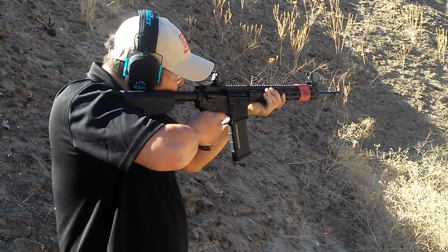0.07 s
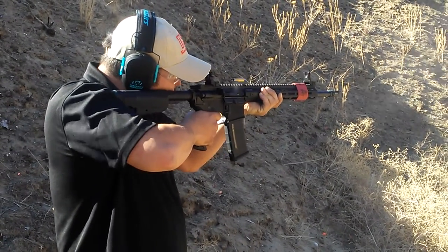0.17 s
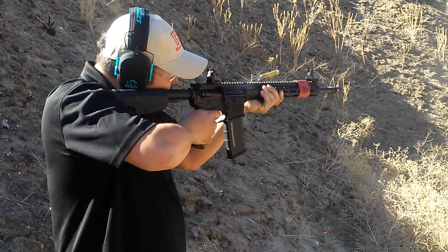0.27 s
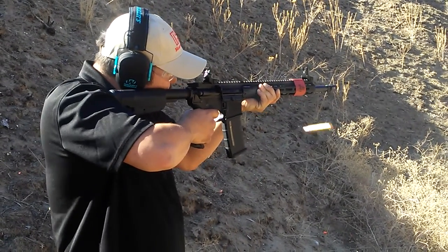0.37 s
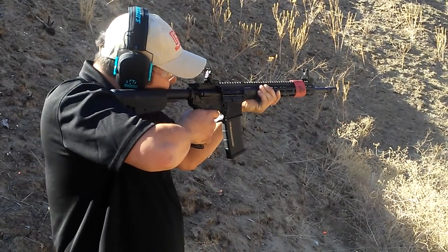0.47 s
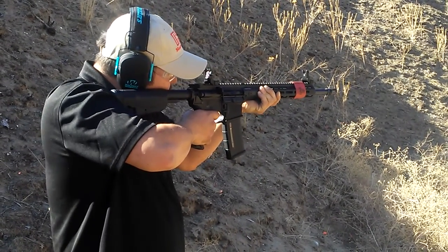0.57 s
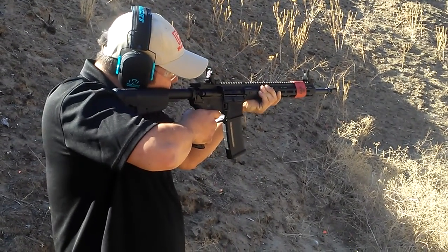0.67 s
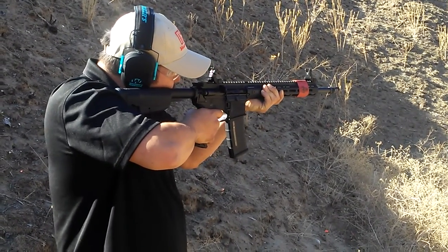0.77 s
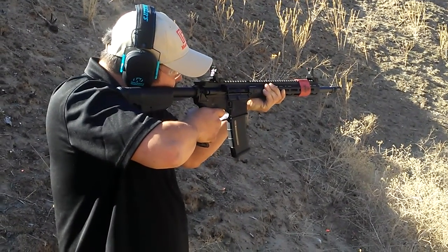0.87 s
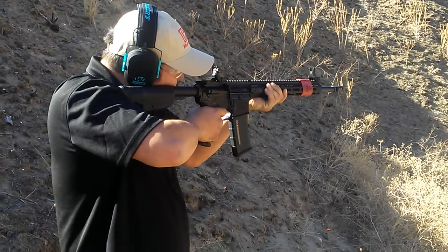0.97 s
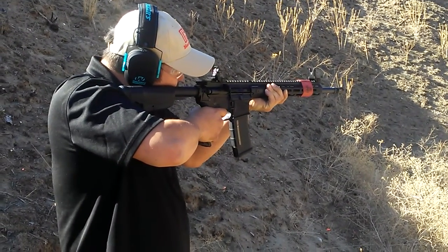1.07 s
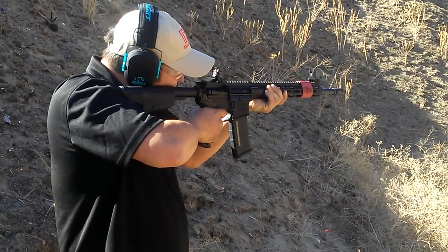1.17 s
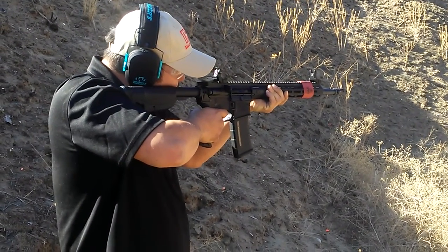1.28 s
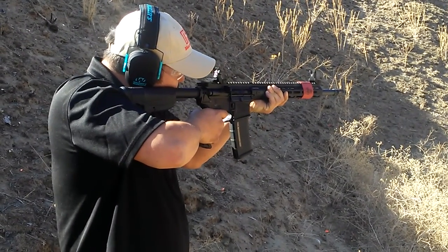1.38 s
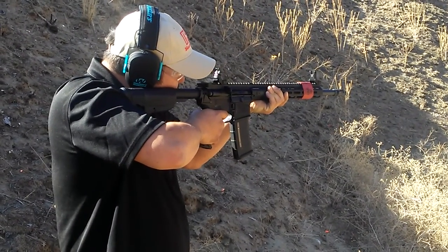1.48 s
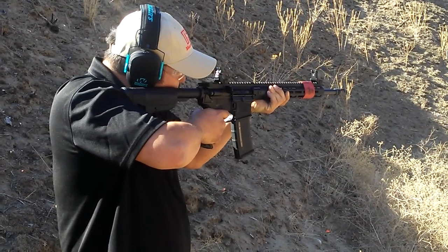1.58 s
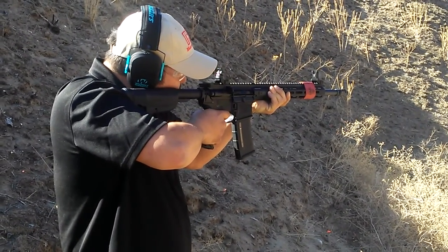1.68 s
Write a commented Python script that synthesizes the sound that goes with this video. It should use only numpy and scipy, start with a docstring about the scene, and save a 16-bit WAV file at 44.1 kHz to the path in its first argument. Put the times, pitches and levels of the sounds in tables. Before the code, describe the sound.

A single close, distorted rifle crack trails into a low rumble and a distant echo.

```python
"""One rifle shot on an outdoor range, close to a small microphone that it drives into hard clipping.
First a far hillside still returns an earlier shot as a dull wash and a low thump. At 0.2 s the action
ticks and the muzzle blast cracks and booms. Earth banks scatter it for half a second over a low roll;
meanwhile the bolt slams shut, then single rocks and slopes answer. From 1.1 s the hillside returns
this shot's wash and thump."""
import sys
import numpy as np
from scipy import signal
from scipy.fft import rfft, irfft, next_fast_len
from scipy.io import wavfile
from scipy.ndimage import map_coordinates

SR = 44100
rng = np.random.default_rng(int(sys.argv[2]) if len(sys.argv) > 2 else 0)


def store_wav(level_fs):
    """Save 16-bit WAV to argv[1]."""
    pcm = np.round(np.clip(np.atleast_2d(level_fs), -1, 1) * 32767)
    wavfile.write(sys.argv[1], SR, pcm.T.astype(np.int16))


N = 77175
TIME_S = np.arange(N) / SR
FFT_SIZE = next_fast_len(N + SR // 4)
FREQ_HZ = np.fft.rfftfreq(FFT_SIZE, 1 / SR)
SHOT_S = 0.2025

# Open-air background: freq_hz, level_db
AIR_SPECTRUM = [(20, 2), (60, 17), (300, 11), (1500, 1.5), (3000, -9.5), (5000, -8), (7000, -16),
                (15000, -14)]
# Washes off the far hillside: centre_s, level_db, half_width_s
HILL_WASHES = [(.02, -41, 0.12), (.15, -40.5, .06), (1.125, -49.5, 0.042), (1.22, -41, 0.041),
               (1.36, -40, 0.079), (1.455, -38.5, .035), (1.55, -44, 0.079), (1.7, -49.5, 0.068)]
# Hillside wash: freq_hz, level_db
HILL_SPECTRUM = [(25, -29.5), (70, -9.5), (120, -8.5), (160, -12), (260, -3.5), (480, -4.5), (690, -1.5),
                 (850, -10), (1200, -7), (1800, -12), (2000, -17), (2350, -17.5), (2800, -40.5),
                 (4000, -38), (6500, -59.5), (15000, -82)]
# Low thumps: the hillside returning an earlier shot, then the blast's push and its returns: centre_s, level_db,
# half_width_s, pitch_hz
BASS_THUMPS = [(.145, -35, .025, 59.9), (.238, -7, 0.017, 57.25), (.377, -5, 0.0017, 192),
               (0.403, -18, 0.018, 88), (.894, -27, 0.006, 228), (1.197, -28, 0.016, 55)]
# Action tick: freq_hz, level_db
TICK_SPECTRUM = [(200, -16), (1200, -6), (2500, 4), (3800, -8.5), (5000, -1.5), (6500, -21), (10000, -17.5),
                 (15000, -22.5)]
# Muzzle crack: freq_hz, level_db
CRACK_SPECTRUM = [(40, -14), (200, -5.5), (500, -0.5), (900, -1.5), (1400, -5), (1950, 1), (2700, -9.5),
                  (4500, -18), (6500, -27), (9000, -40), (15000, -50)]
# Muzzle boom: freq_hz, level_db
BOOM_SPECTRUM = [(20, -39), (36, -26), (55, -2), (130, -10.5), (270, 2), (420, -5.5), (650, 0.5),
                 (1100, -16), (2200, -19), (5000, -24), (7000, -48), (15000, -71.5)]
# Earth-bank scatter: freq_hz, level_db
BANK_SPECTRUM = [(20, -49), (40, -28), (75, -8), (130, -2), (330, 1.5), (700, 1.5), (1300, -3.5),
                 (2050, -5.5), (2650, -15), (4100, -14), (5200, -19), (6300, -30.5), (7400, -46.5),
                 (9000, -41), (15000, -53)]
# Valley rumble: freq_hz, level_db
ROLL_SPECTRUM = [(20, -28), (55, -10), (150, -5.5), (290, -6), (450, -12.5), (900, -22.5), (2200, -26),
                 (3200, -48), (15000, -84)]
# Closing bolt: freq_hz, level_db
BOLT_SPECTRUM = [(200, -22), (1200, -7.5), (2500, 2), (4000, -1.5), (5600, 2.5), (7000, -18.5),
                 (11000, -26.5), (13500, -17), (15500, -22)]
# Slaps off near rocks: start_s, level_db, t60_s, tilt_db_per_octave
ROCK_SLAPS = [(.3635, -26, 0.032, 2), (0.39, -16, 0.42, 2.5), (0.45, -17.5, 0.14, 6),
              (0.497, -18, 0.18, -0.5), (.565, -18.5, 0.03, 2.5), (0.6043, -13, 0.051, -2),
              (.622, -22, 0.066, 5.5), (0.651, -23, 0.029, 8.5), (0.682, -19, 0.081, -4.5)]
# Rock slap before tilt: freq_hz, level_db
ROCK_SPECTRUM = [(100, -41), (500, -18), (1200, 16), (2000, 5), (2700, -2.5), (4300, 2), (5600, -21),
                 (7200, -41), (15000, -64)]
# Echoes off earth slopes: centre_s, level_db, half_width_s
SLOPE_ECHOES = [(.376, -20.5, 0.011), (.415, -12, 0.004), (.55, -18, 0.0046), (.695, -22.5, 0.016),
                (.735, -26, 0.053), (.78, -22.5, 0.02), (.82, -31, 0.016), (.894, -38, 0.0073)]
# Slope echo: freq_hz, level_db
SLOPE_SPECTRUM = [(30, -43.5), (100, -9.5), (280, 2.5), (480, -2.5), (750, -5.5), (950, -15), (1500, -10.5),
                  (2500, -23), (4500, -34), (7000, -65.5), (15000, -67)]


def gain(level_db):
    """Decibels to amplitude."""
    return 10 ** (level_db / 20)


def noise(spectrum):
    """Noise of rms 1, spectrum interpolated over log frequency."""
    freq_hz, level_db = np.transpose(spectrum)
    shape_db = np.interp(np.log(FREQ_HZ + 1), np.log(freq_hz + 1), level_db)
    white = rng.standard_normal(FFT_SIZE)
    shaped = irfft(rfft(white) * gain(shape_db), FFT_SIZE)[:N]
    return shaped / np.sqrt(np.mean(shaped ** 2))


def burst(start_s, level_db, t60_s, rise_s):
    """Envelope: quick rise, exponential decay."""
    age_s = np.maximum(TIME_S - start_s, 0)
    return (1 - np.exp(-age_s / rise_s)) * gain(level_db - 60 * age_s / t60_s)


def swell(centre_s, level_db, half_width_s):
    """Gaussian envelope."""
    return gain(level_db) * np.exp(-0.5 * ((TIME_S - centre_s) / half_width_s) ** 2)


def swells(rows):
    """Envelope of unrelated swells, summed in power."""
    return np.sqrt(sum(swell(*row) ** 2 for row in rows))


def flicker(rate_hz, depth_db):
    """Smooth random gain."""
    knots = rng.standard_normal(N // 10)
    return gain(depth_db * map_coordinates(knots, [TIME_S * rate_hz]))


def open_air():
    """Quiet, steady background."""
    return gain(level_db=-55.5) * noise(AIR_SPECTRUM)


def hillside():
    """Far echoes, treble lost on the way."""
    return swells(HILL_WASHES) * flicker(rate_hz=56, depth_db=1.17) * noise(HILL_SPECTRUM)


def thumps():
    """Pressure waves of a few low cycles each."""
    return sum(swell(centre_s, level_db, half_width_s) * np.sin(2 * np.pi * pitch_hz * (centre_s - TIME_S))
               for centre_s, level_db, half_width_s, pitch_hz in BASS_THUMPS)


def action_tick():
    """The action ticks just ahead of the blast."""
    return burst(start_s=0.195, level_db=-17, t60_s=0.03, rise_s=0.0005) * noise(TICK_SPECTRUM)


def muzzle_blast():
    """Sharp crack, slower boom behind it."""
    crack = burst(SHOT_S, level_db=18.5, t60_s=0.1, rise_s=0.0022) * noise(CRACK_SPECTRUM)
    boom = burst(SHOT_S, level_db=9, t60_s=0.3, rise_s=0.012) * noise(BOOM_SPECTRUM)
    return crack + boom


def bank_scatter(air_db_per_s_khz2=0.25, end_s=0.793, end_db_per_s=197):
    """Dense, uneven scatter; dulls with path length, dies where the banks end."""
    freq_hz, frame_s, frames = signal.stft(noise(BANK_SPECTRUM), SR, nperseg=256)
    freq_khz = freq_hz[:, None] / 1000
    air_loss_db = air_db_per_s_khz2 * freq_khz ** 2 * np.maximum(frame_s - SHOT_S, 0)
    end_loss_db = end_db_per_s * np.maximum(frame_s - end_s, 0)
    _, scatter = signal.istft(frames * gain(-air_loss_db - end_loss_db), SR, nperseg=256)
    envelope = burst(SHOT_S, level_db=-1, t60_s=0.98, rise_s=0.015)
    return envelope * flicker(rate_hz=220, depth_db=1) * scatter[:N]


def valley_roll():
    """Low rumble lingering in the valley."""
    return burst(SHOT_S, level_db=-15.5, t60_s=1.706, rise_s=0.08) * noise(ROLL_SPECTRUM)


def bolt_slam():
    """The bolt shuts on the next round."""
    return burst(start_s=0.2865, level_db=-7, t60_s=0.035, rise_s=0.0005) * noise(BOLT_SPECTRUM)


def rock_slaps(pivot_hz=1500):
    """Sharp reflections, brighter or duller with each rock face."""
    slaps = np.zeros(N)
    for start_s, level_db, t60_s, tilt_db_per_octave in ROCK_SLAPS:
        tilted = [(hz, db + tilt_db_per_octave * np.log2(hz / pivot_hz)) for hz, db in ROCK_SPECTRUM]
        slaps += burst(start_s, level_db, t60_s, rise_s=0.0018) * noise(tilted)
    return slaps


def slope_echoes():
    """Dull, rounded returns off earth slopes."""
    return swells(SLOPE_ECHOES) * noise(SLOPE_SPECTRUM)


def scene():
    """Shot and echoes over open air, mono."""
    rifle = action_tick() + muzzle_blast() + bolt_slam()
    echoes = bank_scatter() + rock_slaps() + slope_echoes() + valley_roll() + hillside()
    return (rifle + echoes + thumps() + open_air())[None]


def record(dry, ceiling=0.9, hardness=12, cutoff_hz=15750, edge_hz=500):
    """The overloaded input flattens the peaks; a low-pass follows."""
    clipped = dry / (1 + np.abs(dry / ceiling) ** hardness) ** (1 / hardness)
    passband = np.clip(0.5 + (cutoff_hz - FREQ_HZ) / edge_hz, 0, 1)
    return irfft(rfft(clipped, FFT_SIZE) * passband, FFT_SIZE)[..., :N]


dry = scene()
out = record(dry)
store_wav(out)
```